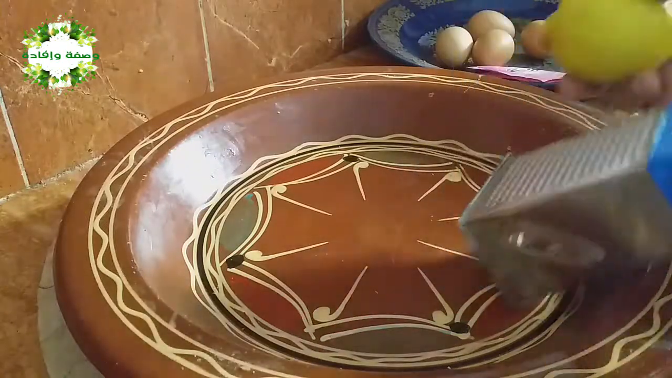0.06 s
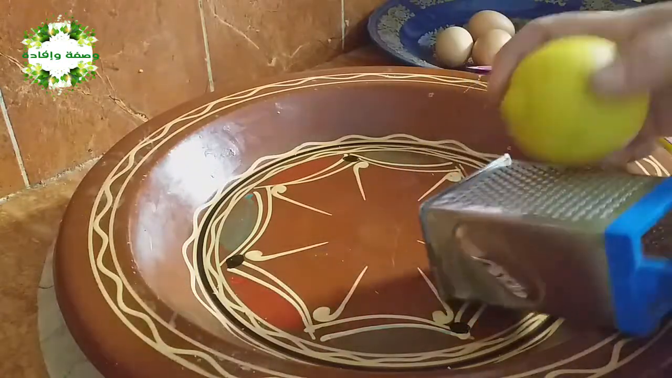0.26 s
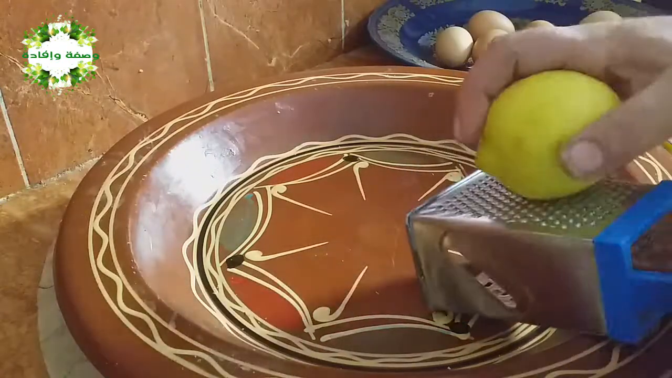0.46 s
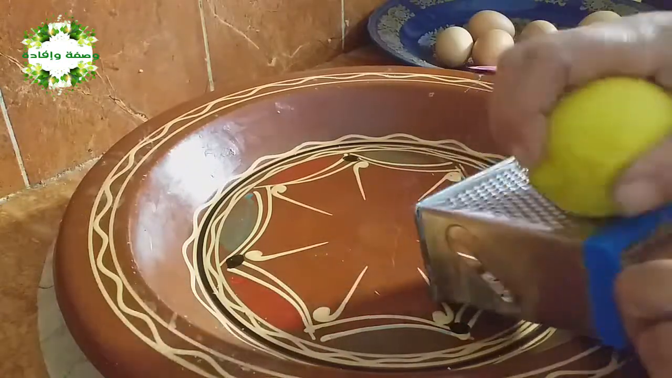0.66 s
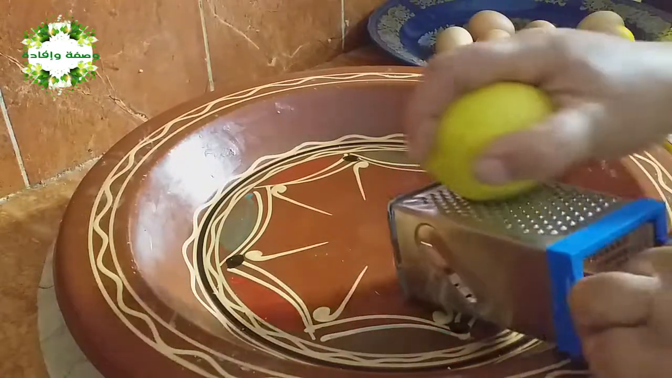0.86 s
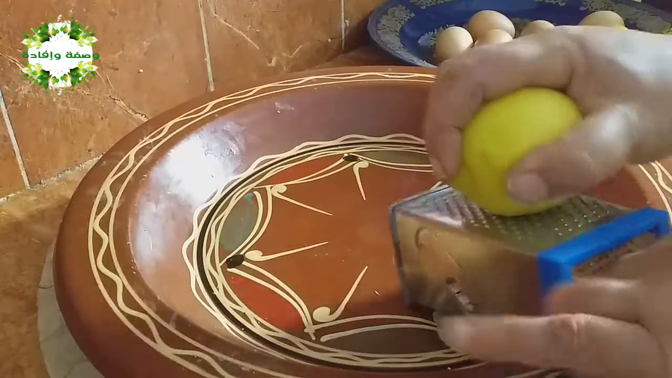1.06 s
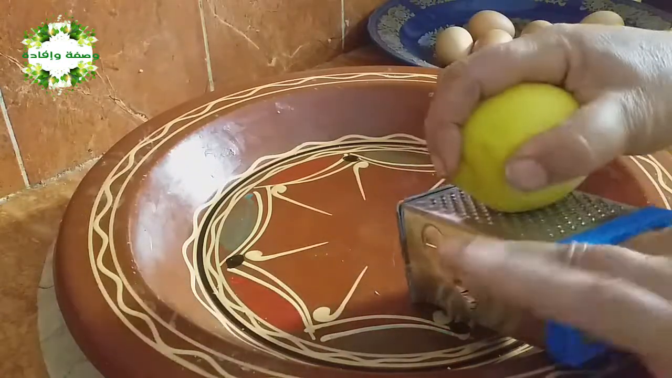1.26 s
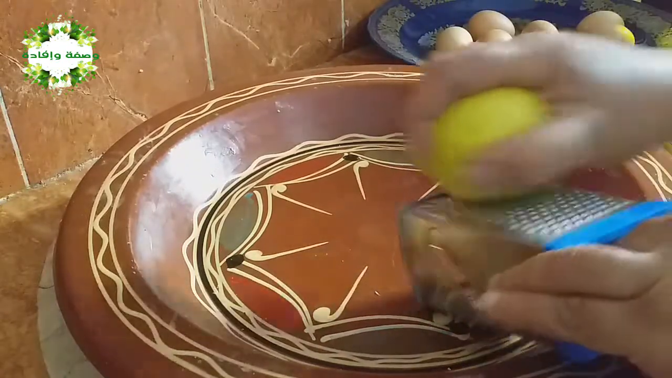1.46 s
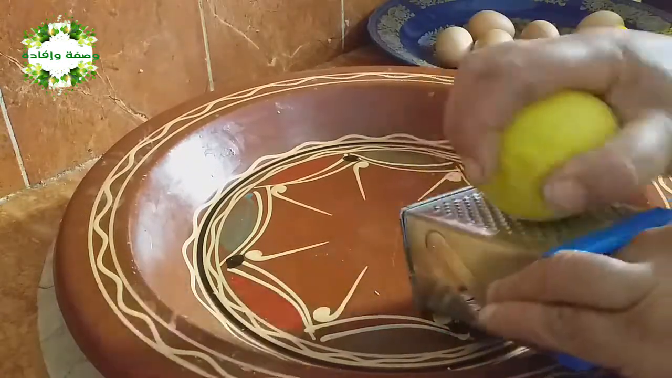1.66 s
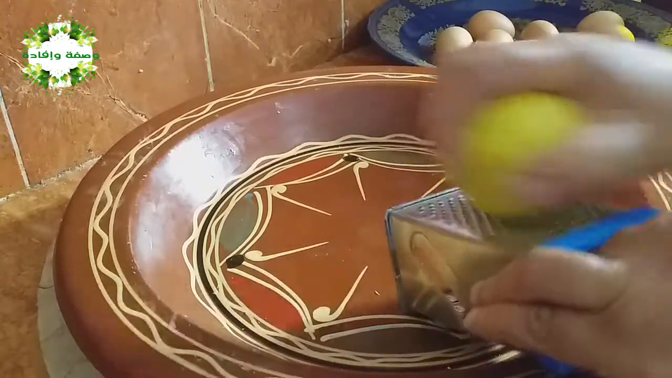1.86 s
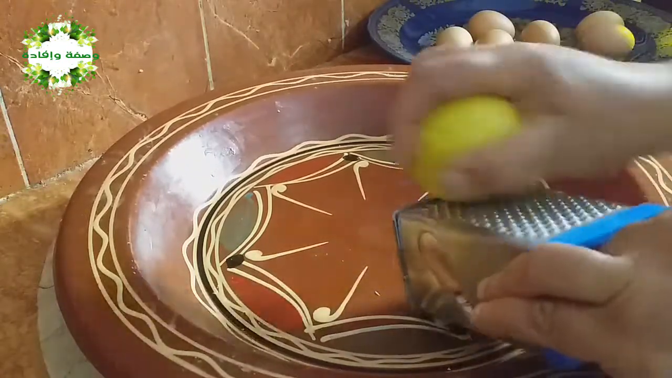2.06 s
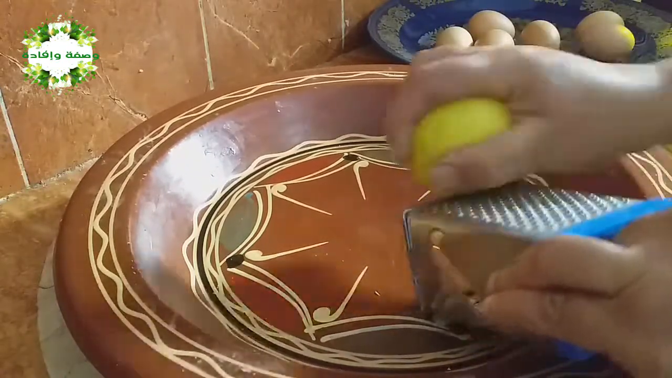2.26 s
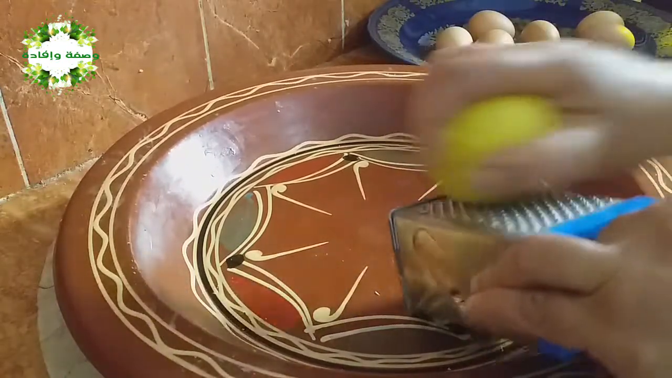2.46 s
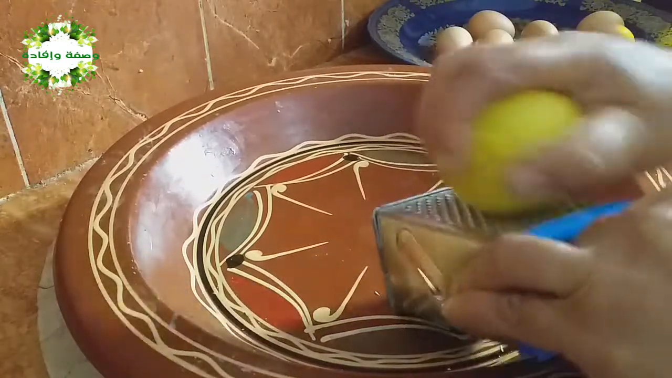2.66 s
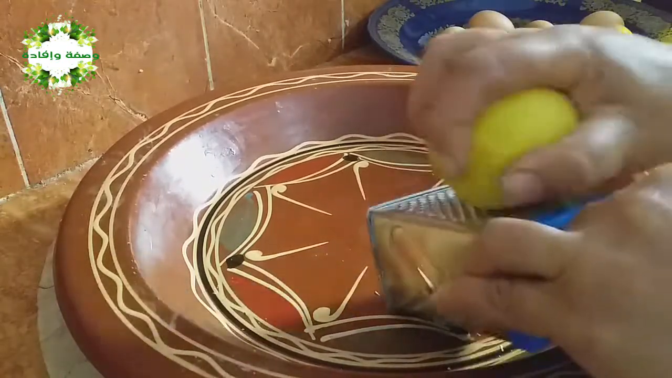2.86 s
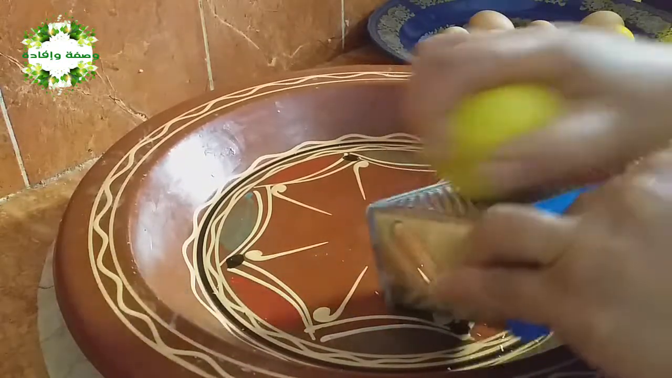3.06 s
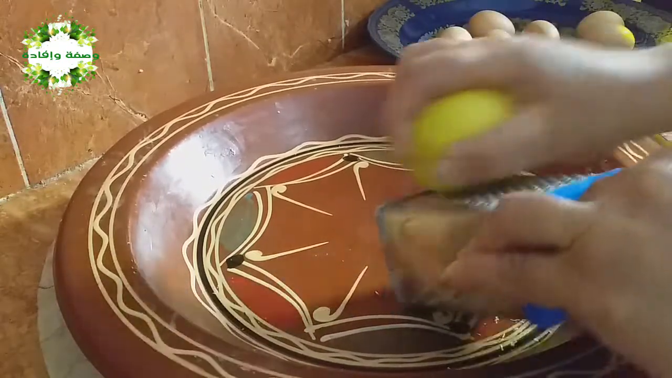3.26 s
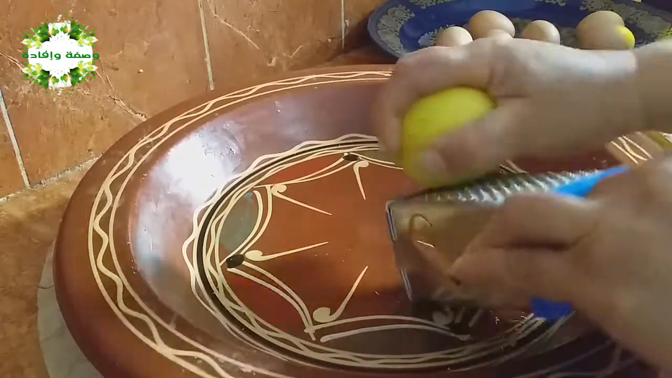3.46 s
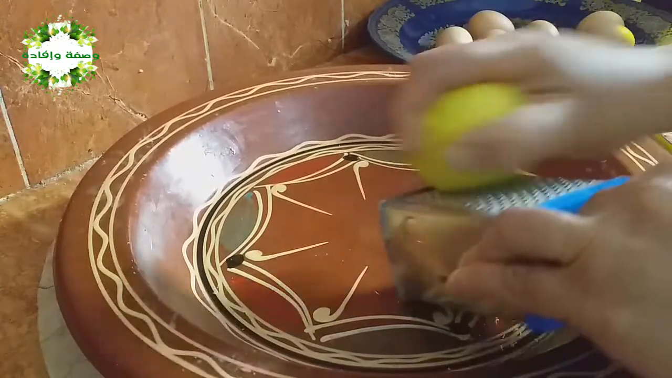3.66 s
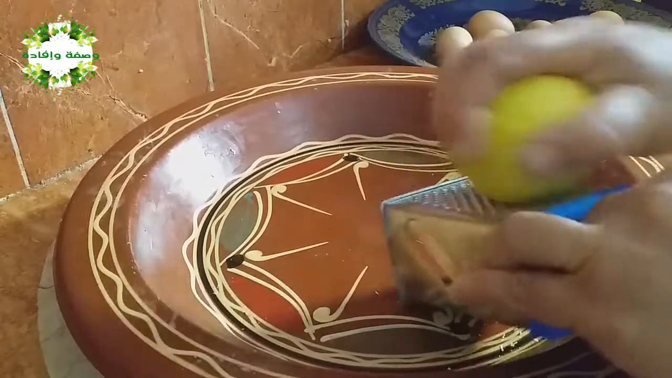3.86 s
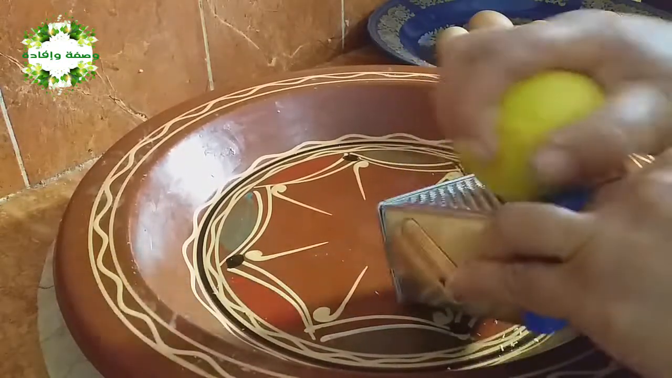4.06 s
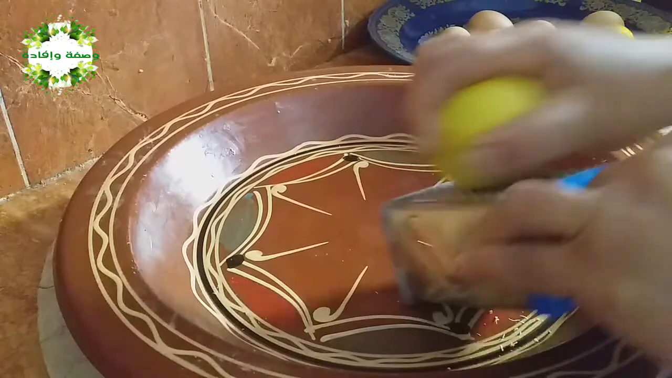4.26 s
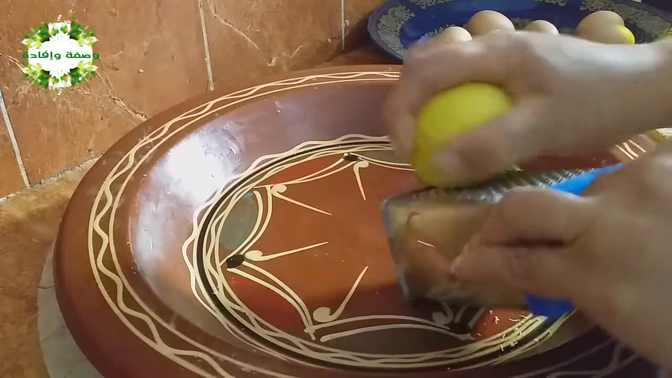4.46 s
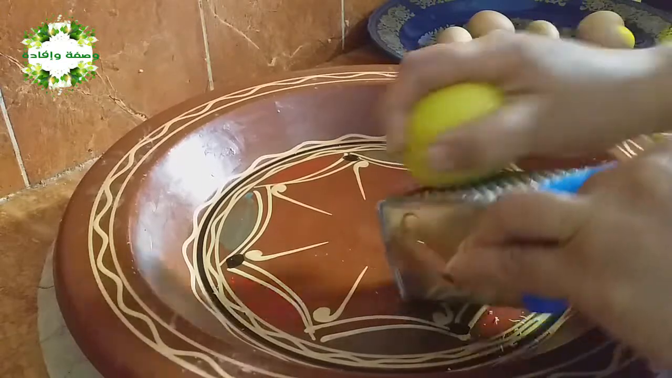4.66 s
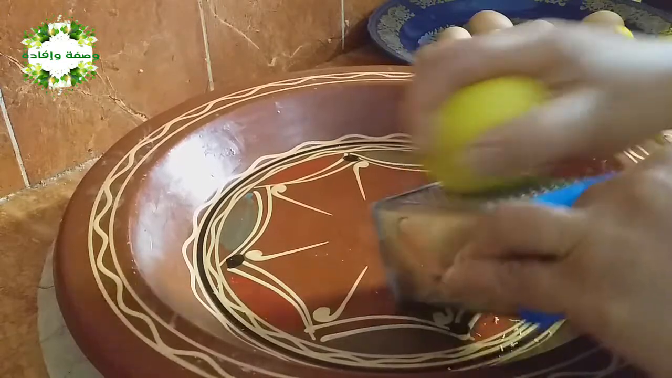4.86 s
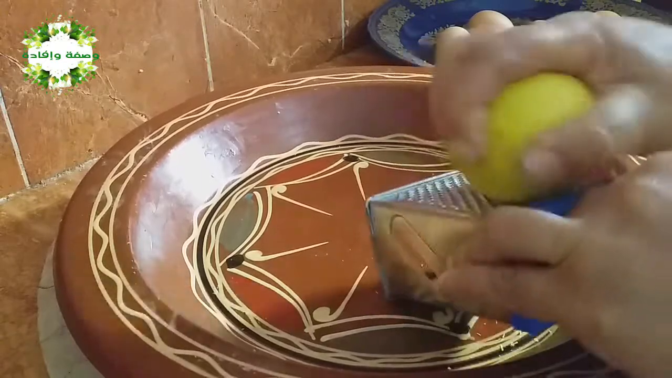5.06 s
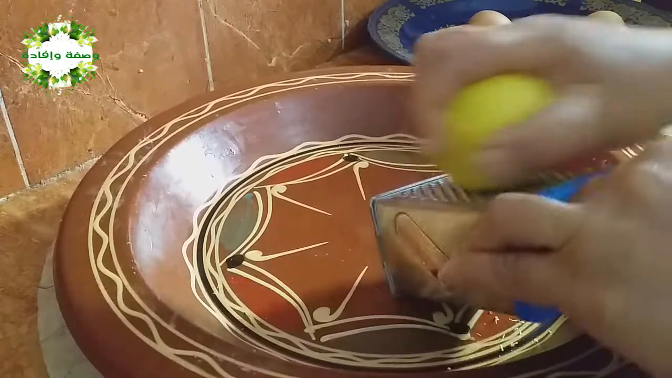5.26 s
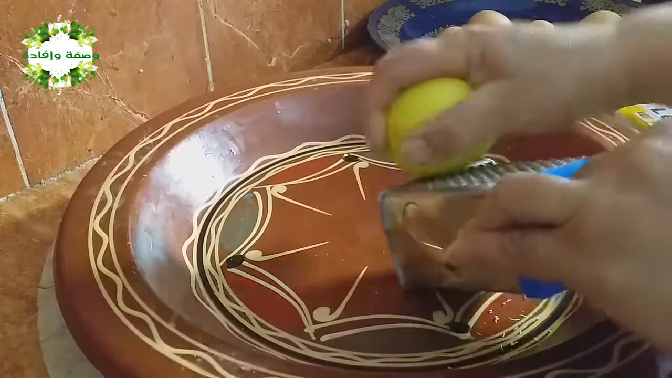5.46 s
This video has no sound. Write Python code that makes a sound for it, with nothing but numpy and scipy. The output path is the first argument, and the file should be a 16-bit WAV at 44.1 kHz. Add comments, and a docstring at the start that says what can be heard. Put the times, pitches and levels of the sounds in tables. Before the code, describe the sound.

Close up, brief steel clinks and sliding skin lead into steady rapid scraping of lemon rind on a hollow-ringing metal grater.

```python
"""A steel box grater is set down in a clay dish and gripped, with knocks and sliding skin, close up in mono.
Then a lemon is grated: the teeth tear the rind in dense tiny snaps that ring the steel walls.
Each push and pull also jolts the dish, a lumpy low rumble, and a diffuse kitchen tail follows every sound.
A noise suppressor hollows out the pauses; hum and a thin whine leak through."""
import sys
import numpy as np
from scipy import signal
from scipy.fft import rfft, irfft, next_fast_len
from scipy.io import wavfile
from scipy.ndimage import uniform_filter1d

SR = 44100
rng = np.random.default_rng(int(sys.argv[2]) if len(sys.argv) > 2 else 0)


def wrap_up_sound(samples):
    """Save the sound to the file named by the first command line argument, as 16-bit audio."""
    columns = np.atleast_2d(samples).T
    # keep every value between -1 and 1, then stretch to whole-number steps
    tamed = np.clip(columns, -1, 1)
    steps = np.round(tamed * 32767).astype(np.int16)
    wavfile.write(sys.argv[1], SR, steps)


def nominal_scale(level):
    """Amplitude ratio for a level in decibels (scalar or array-like)."""
    x = np.asarray(level, float) / 20
    return 10 ** x


N = 243343  # samples


def rms_one(x):
    """Scale to rms 1."""
    return x / np.sqrt(np.mean(x ** 2) + 1e-20)


def colour(x, spectrum):
    """Filter by a (Hz, dB) spectrum, interpolated over log frequency; rms 1."""
    size = next_fast_len(N + 4096)
    hz, db = np.transpose(spectrum)
    grid_hz = np.maximum(np.arange(size // 2 + 1) * SR / size, 1)
    gain = nominal_scale(np.interp(np.log(grid_hz), np.log(hz), db, left=-90, right=-90))
    return rms_one(irfft(rfft(x, size) * gain, size)[:N])


def resonate(x, hz, width_hz):
    """One two-pole resonance, gain 1 on top."""
    r = np.exp(-np.pi * width_hz / SR)
    zeros = [(1 - r * r) / 2, 0, (r * r - 1) / 2]
    poles = [1, -2 * r * np.cos(2 * np.pi * hz / SR), r * r]
    return signal.lfilter(zeros, poles, x + 1e-18)


def snaps(per_s, spread_db):
    """Random clicks of uneven size and either sign; rms 1."""
    sizes = nominal_scale(spread_db * np.minimum(rng.exponential(1, N), 5)) * rng.choice([-1, 1], N)
    return rms_one(sizes * (rng.random(N) < per_s / SR))


def flicker(per_s, depth_db):
    """Slow random gain: low-passed noise taken as dB."""
    r = np.exp(-2 * np.pi * per_s / SR)
    wander = signal.lfilter([1], [1, -2 * r, r * r], rng.standard_normal(N))
    return nominal_scale(depth_db * rms_one(wander))


def patchy(x, per_s, depth_db):
    """The colour wanders: slices of the spectrum up to 16 kHz each get their own slow gain."""
    out, below = 0, 0
    for edge_hz in np.geomspace(700, 16000, 9):
        upto = signal.sosfiltfilt(signal.butter(2, edge_hz, fs=SR, output="sos"), x)
        out = out + (upto - below) * flicker(per_s, depth_db)
        below = upto
    return out + x - below


# rind on teeth, relative spectrum: hz [Hz], level_db [dB per Hz]
RIND_SPECTRUM = [(200, -58), (420, -17), (700, -10.5), (1300, -10.5), (2030, -12.5), (3000, -11),
                 (4520, -8), (6000, -13), (7700, -8.5), (8700, -21.5), (10500, -16), (13300, -13),
                 (15700, -15.5), (16000, -35)]
# grating strokes, push and pull in turn: middle_s [s], peak_db [dB, relative],
# pitch_hz [Hz, favoured wall pitch], jolt_db [dB, push on the dish], ring_db [dB re peak, relative]
GRATING_STROKES = [(1.467, -8, 870, -67, -15.5), (1.625, -10, 662, -50.5, -14), (1.75, -9, 733, -48, -25),
                   (1.874, -10, 880, -71, -12), (1.992, -5.5, 607, -40, -16.5),
                   (2.118, -11, 660, -45.5, -14.5), (2.228, -6.5, 620, -39, -12.5),
                   (2.359, -6.5, 1250, -39, -16.5), (2.473, -6, 635, -36, -17),
                   (2.597, -7.5, 1820, -56, -12.5), (2.711, -9.5, 596, -60, -9),
                   (2.832, -8.5, 1500, -67, -15.5), (2.947, -6, 1140, -40, -12),
                   (3.065, -5.5, 1390, -70, -15.5), (3.179, -6, 1157, -38.5, -12.5),
                   (3.303, -7, 1420, -57.5, -13), (3.419, -6.5, 1190, -51, -12.5),
                   (3.543, -6, 1656, -55, -13.5), (3.661, -6.5, 1150, -33, -13),
                   (3.787, -8.5, 1060, -56, -11.5), (3.909, -7, 1200, -38.5, -14.5),
                   (4.033, -8.5, 1670, -53, -13), (4.151, -7, 1110, -36, -14),
                   (4.281, -8.5, 1450, -48, -12.5), (4.398, -8.5, 630, -45.5, -13),
                   (4.519, -8.5, 1460, -57, -12.5), (4.64, -8, 1150, -41, -14.5),
                   (4.766, -8, 1690, -55.5, -17.5), (4.882, -8.5, 1120, -47, -12),
                   (5.007, -8, 1360, -45.5, -13.5), (5.131, -6, 1060, -48.5, -15.5),
                   (5.259, -9, 559, -58, -15.5), (5.38, -10.5, 936, -53, -13)]


def grating():
    """One stream of snaps is heard directly and through the walls; each stroke favours some wall modes."""
    _, peak_db, pitch_hz, _, ring_db = np.transpose(GRATING_STROKES)
    stream = snaps(per_s=12000, spread_db=1.5) * flicker(per_s=68, depth_db=1.0)

    shape, which = stroke_shape(sharpness=1.0, lag_s=0.00092, fade_s=0.0034)
    tearing = patchy(colour(stream, RIND_SPECTRUM), per_s=7.1, depth_db=3.0)
    direct = tearing * shape * nominal_scale(peak_db - 15.0)[which]

    shape, which = stroke_shape(sharpness=6.1, lag_s=0.0014, fade_s=0.016)
    force = stream * shape * nominal_scale(peak_db + ring_db + 8.0)[which]

    def favour(hz):
        """Up to 10 dB more for modes near the stroke's pitch, where the fruit presses."""
        return nominal_scale(10 * np.exp(-(np.log(hz / pitch_hz) / 0.05) ** 2))[which]

    return direct + walls(force, favour)


# push, then pull: lead_s [s, start before the middle], length_s [s], skew [0-1, place of the top]
PUSH_AND_PULL = [(0.041, 0.094, 0.3), (.047, 0.095, 0.36)]


def stroke_shape(sharpness, lag_s, fade_s):
    """Speed swells and dies within each stroke, top early by the skew; also tells which stroke is on."""
    middle_s = np.transpose(GRATING_STROKES)[0]
    lead_s, length_s, skew = np.array(PUSH_AND_PULL)[np.arange(len(middle_s)) % 2].T
    t, start_s = np.arange(N) / SR - lag_s, middle_s - lead_s
    which = np.maximum(np.searchsorted(start_s, t) - 1, 0)
    phase = np.clip((t - start_s[which]) / length_s[which], 0, 1)
    bend = np.log(.5) / np.log(np.clip(skew[which], .1, .9))
    speed = np.sin(np.pi * phase ** bend).clip(0) ** sharpness
    r = np.exp(-1 / (fade_s * SR))   # the fruit does not stop dead
    return signal.lfilter([1 - r], [1, -r], speed), which


# pitches of the grater's wall modes: pitch_hz [Hz]
WALL_PITCHES = [188, 335, 460, 536, 662, 790, 910, 995, 1145, 1175, 1225, 1310, 1395, 1576, 1665, 1900,
                2240, 2446, 2600, 2730, 2890, 3400, 3660, 3930, 4425, 4900, 5550, 7590]
# the same modes in the same order: width_hz [Hz], level_db [dB, relative]
WALL_MODES = [(22, -37), (20, -37), (30, -29), (25.8, 5), (30, -0.5), (40, 2.5), (27, 0.5), (28.7, 6.5),
              (31, 3.5), (30, 1.5), (30, 1), (44.7, 7), (30, -2.5), (30, 7.5), (41.3, -3), (50, -38),
              (49.7, -4.5), (40, 6), (55, -6), (45, 6), (60.5, -3.5), (80, -15), (60, -11.5), (70, -19),
              (80, -2), (120, -64), (120, -0.5), (300, -35)]


def walls(force, favour=lambda hz: 1):
    """The steel walls: all modes ring together as resonances, signs alternating."""
    ring = 0
    for k, (hz, (width_hz, db)) in enumerate(zip(WALL_PITCHES, WALL_MODES)):
        gain = (-1) ** k * nominal_scale(db) * np.sqrt(40 / width_hz)   # evens out broad and narrow modes
        ring = ring + gain * resonate(force * favour(hz), hz, width_hz)
    return ring


# dish on the counter, relative spectrum: hz [Hz], level_db [dB per Hz]
DISH_SPECTRUM = [(30, -40), (60, -10), (110, -2.5), (185, 6), (250, 0.5), (330, 5), (420, 6), (560, 8.5)]


def rocking():
    """Lumpy low rumble: each stroke jolts the dish, and sliding hands rock it a little."""
    shape, which = stroke_shape(sharpness=0.85, lag_s=0.005, fade_s=0.0015)
    jolt_db = np.transpose(GRATING_STROKES)[3]
    r = np.exp(-1 / (0.046 * SR))   # the dish settles over 46 ms
    jolts = signal.lfilter([1 - r], [1, -r], shape * nominal_scale(jolt_db)[which])
    rocks = nominal_scale(-19) * touch_force(column=3)   # relative to the wall ring of a slide
    shake = colour(rng.standard_normal(N), DISH_SPECTRUM) * flicker(per_s=8.3, depth_db=5.5)
    return shake * (jolts + rocks)


# skin on steel, relative spectrum: hz [Hz], level_db [dB per Hz]
RUSTLE_SPECTRUM = [(880, -34), (1500, -13), (1970, -6), (2560, -19), (3180, -1.5), (5190, 1), (7710, 2.5),
                   (8600, -25), (11200, -59), (18900, -120)]
# airy top of the sliding skin, relative spectrum: hz [Hz], level_db [dB per Hz]
SKIN_HISS_SPECTRUM = [(8000, 2), (9200, -3), (14300, 5.5), (15700, -2), (16000, -41)]


def handling():
    """Sliding skin rustles, hisses and rings the walls, mostly the low ones."""
    stream = snaps(per_s=15000, spread_db=1.5) * flicker(per_s=40, depth_db=1.2)
    force = touch_force(column=2)
    rustle = patchy(colour(stream, RUSTLE_SPECTRUM), per_s=22, depth_db=3.0) * force

    firm_db, hiss_at_firm_db, growth = -30.5, -30.5, 1.87   # the hiss grows faster than the rustle
    hiss_level = nominal_scale(hiss_at_firm_db) * (force / nominal_scale(firm_db)) ** growth
    hiss = colour(stream, SKIN_HISS_SPECTRUM) * hiss_level

    lowpass = signal.butter(2, 1600, fs=SR, output="sos")
    soft = rms_one(signal.sosfilt(lowpass, stream)) * touch_force(column=3)
    return rustle + hiss + nominal_scale(1.5) * walls(soft)


# hands and fruit sliding on the grater: full_s [s, full pressure is reached], held_s [s],
# rustle_db [dB], ring_db [dB, drive to the walls, relative], let_go_db_per_s [dB per s]
HAND_SLIDES = [(.001, .005, -46.5, -79, 150), (.1, 0.056, -39, -47.5, 100),
               (0.281, 0.076, -38.5, -40.5, 402), (0.489, .04, -46, -75, 100),
               (0.569, 0.063, -37.5, -41.5, 293), (.69, 0.07, -37, -35.5, 396), (.77, .12, -31, -38, 299.5),
               (0.998, 0.043, -33, -40, 298.5), (1.151, .015, -47, -49.5, 292),
               (1.29, 0.021, -38, -49, 452)]


def touch_force(column):
    """Force of the light contacts before the grating: each slide rises, holds and falls in dB."""
    t, slides = np.arange(N) / SR, np.array(HAND_SLIDES)[:, :, None]
    full_s, held_s, let_go_db_per_s = slides[:, 0], slides[:, 1], slides[:, 4]
    rise_db_per_s = 315
    early_s = np.maximum(full_s - t, 0)
    late_s = np.maximum(t - full_s - held_s, 0)
    level_db = slides[:, column] - rise_db_per_s * early_s - let_go_db_per_s * late_s
    return nominal_scale(level_db).max(axis=0)   # the strongest slide wins


# knocks of the grater on the dish: start_s [s], level_db [dB, relative], centre_hz [Hz], t60_s [s]
DISH_KNOCKS = [(0.109, -17, 3660, 0.043), (0.113, -24.5, 1254, 0.31), (.262, -28.5, 690, 0.22),
               (0.272, -22.5, 5800, 0.054), (0.673, -11, 4060, 0.053), (0.726, -7, 3000, 0.025),
               (0.966, -19.5, 714, 0.033), (1.533, -18.5, 885, 0.026), (1.948, -17, 354, 0.12),
               (2.47, -24, 340, 0.088), (3.896, -12.5, 2800, 0.013), (5.315, -24, 3000, .08)]


def knocks():
    """Each knock is a tick and a short rattle around its centre pitch, and rings the walls."""
    t, crack = np.arange(N) / SR, np.zeros(N)
    noise = rng.standard_normal(N)
    for start_s, level_db, centre_hz, t60_s in DISH_KNOCKS:
        # the rattle holds for 10 ms, then dies
        burst = noise * (t >= start_s) * nominal_scale(-60 * np.maximum(t - start_s - .01, 0) / t60_s)
        burst[round(start_s * SR)] = 10.0   # the tick
        width_hz = centre_hz * (.4 + centre_hz / 5000)   # hard contacts are bright and broad
        gain = nominal_scale(level_db - 12.0) * np.sqrt(SR / 4 / width_hz)
        crack += gain * resonate(burst, centre_hz, width_hz)
    return crack + nominal_scale(6.0) * walls(crack)


def kitchen(x):
    """Diffuse room tail: the sound convolved with dying noise of unit energy."""
    t60_s, gap_s = 0.61, 0.004
    t = np.arange(SR // 2) / SR
    tail = rng.standard_normal(len(t)) * nominal_scale(-60 * t / t60_s) * (t > gap_s)
    return signal.fftconvolve(x, tail / np.sqrt(np.sum(tail ** 2)))[:N]


# room hiss, relative spectrum: hz [Hz], level_db [dB per Hz]
ROOM_HISS_SPECTRUM = [(250, -23), (450, -2.5), (900, -4.5), (1300, -11), (2300, -9), (3500, -6),
                      (7500, -11.5), (9000, -13), (15700, -15)]


def background():
    """Wavering mains hum and its octave, a thin whine and room hiss."""
    hum_hz, whine_hz = 50, 1576
    turns = 2 * np.pi * np.arange(N) / SR
    hum = np.sin(turns * hum_hz) + .6 * np.sin(2 * turns * hum_hz)
    hum = nominal_scale(-63) * hum * flicker(per_s=10, depth_db=0.7)
    whine = nominal_scale(-47) * np.sin(turns * whine_hz) * flicker(per_s=18, depth_db=0.1)
    hiss = nominal_scale(-47.5) * colour(rng.standard_normal(N), ROOM_HISS_SPECTRUM)
    return hum + whine + hiss


def scene():
    """Grater, dish, room and background, alike in both channels."""
    near = grating() + handling() + knocks() + rocking()
    return np.tile(near + nominal_scale(-9) * kitchen(near) + background(), (2, 1))


def top_cut(x):
    """Nothing passes above the cut-off."""
    return signal.sosfilt(signal.butter(12, 16640, fs=SR, output="sos"), x)


def record(dry):
    """Noise suppressor: finds each band's steady power in its quietest moments and gates against it."""
    over, floor_db = 0.95, -30
    _, _, bins = signal.stft(dry[0], nperseg=512, noverlap=384)
    power = uniform_filter1d(np.abs(bins) ** 2, size=5, axis=0)   # smooth over frequency
    power = uniform_filter1d(power, size=15, axis=1)   # smooth over time
    steady = np.percentile(power, 3, axis=1, keepdims=True)
    gain = np.maximum(1 - over * steady / (power + 1e-20), 0) ** 2
    gain = uniform_filter1d(gain, size=7, axis=1) + nominal_scale(floor_db)   # gradual gain; a little leaks through
    mono = signal.istft(bins * gain, nperseg=512, noverlap=384)[1][:N]
    return top_cut(np.array([mono, mono]))


dry = scene()
out = record(dry)
wrap_up_sound(out)
```